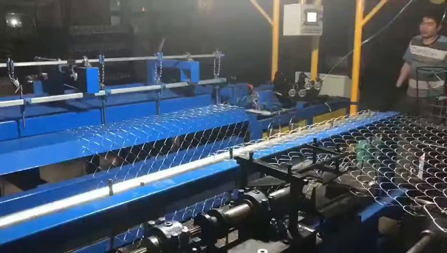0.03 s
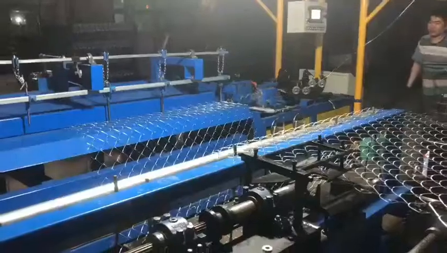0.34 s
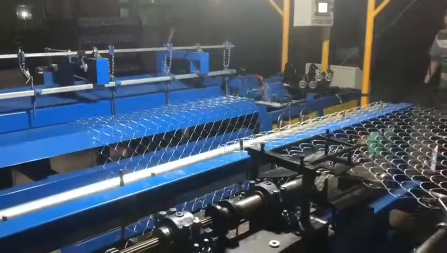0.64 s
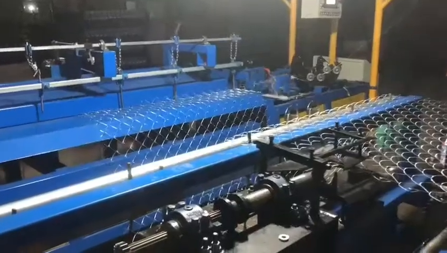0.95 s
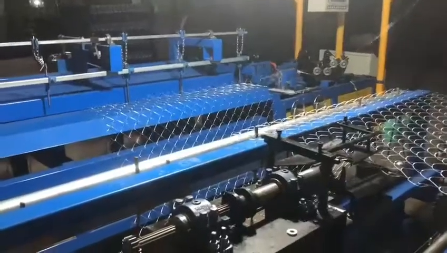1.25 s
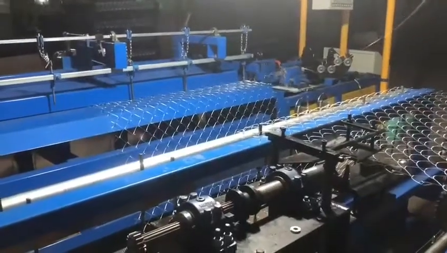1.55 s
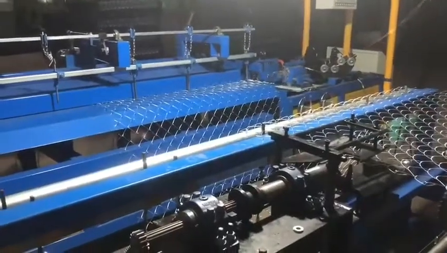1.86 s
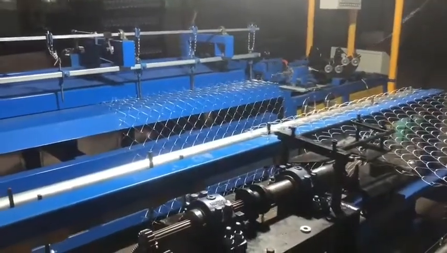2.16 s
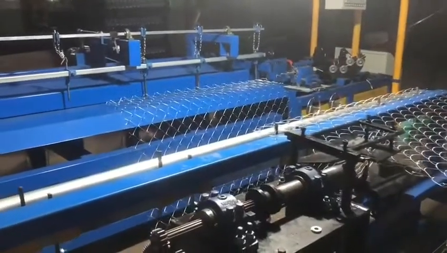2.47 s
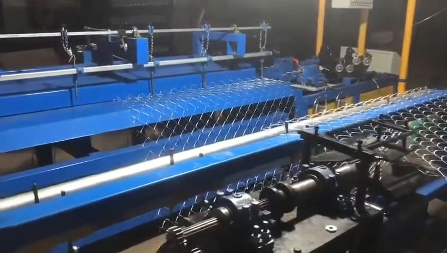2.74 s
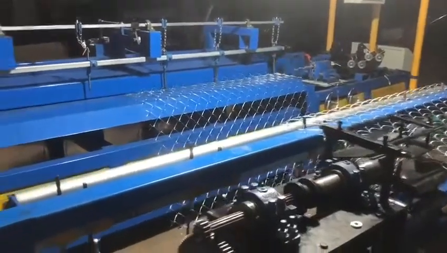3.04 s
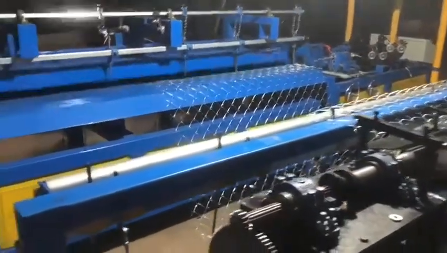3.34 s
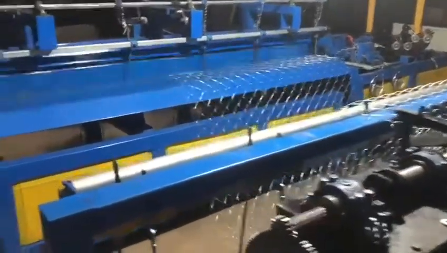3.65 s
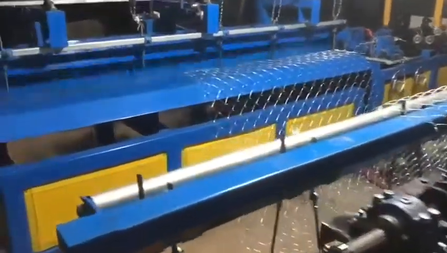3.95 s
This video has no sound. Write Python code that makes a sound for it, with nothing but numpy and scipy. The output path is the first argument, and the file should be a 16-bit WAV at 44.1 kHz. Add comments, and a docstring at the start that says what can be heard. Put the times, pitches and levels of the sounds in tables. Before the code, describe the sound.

Wire weaving machinery rattles rapidly in a rumbling workshop, ending with heavy steel clanks.

```python
"""A wire-mesh weaving machine works in a hard-walled, rumbling workshop.
First its gears grind and the twisting spindles clatter about nine times a second, over shaft knocks and
light clinks. Near 2.4 s they run down; a joint squeaks and a feed motor whines up. At 2.7 s the frame
takes a heavy clunk, then the mesh scrapes over the bed. At 3.5 s the beam shifts, settles with a low
boom and slams against its steel stops, leaving the bed shuddering as the rumble swells."""
import sys
import numpy as np
from scipy import signal
from scipy.fft import rfft, irfft
from scipy.io import wavfile
from scipy.ndimage import uniform_filter1d

SR = 44100
rng = np.random.default_rng(int(sys.argv[2]) if len(sys.argv) > 2 else 0)


def materialize(psi):
    """Save the field psi as 16-bit PCM at rate SR to the path in sys.argv[1].

    A 1-D psi becomes a single channel; in a 2-D psi each row is a channel.
    """
    bounded = np.clip(np.atleast_2d(psi).T, -1, 1)
    quanta = np.round(bounded * 32767).astype(np.int16)
    wavfile.write(sys.argv[1], SR, quanta)


N = 176400
TIME = np.arange(N) / SR

# Fader rides for the sustained layers. Each row: time in seconds, level in dB.
DRIVE_LEVEL = [(0, -32.5), (.4, -33), (.8, -31), (1.3, -32), (1.65, -30.5), (2.0, -32.5), (2.2, -31.5),
               (2.35, -37.5), (2.48, -47), (2.6, -68)]
SCRAPE_LEVEL = [(3.12, -79), (3.19, -42), (3.28, -38), (3.38, -36), (3.5, -34.5), (3.6, -45), (4, -63)]
CHURN_LEVEL = [(2.42, -48.5), (2.53, -38), (2.7, -38), (3.05, -36.5), (3.2, -55), (3.5, -44), (4, -32)]
RUMBLE_LEVEL = [(0, -41.5), (2.5, -43.5), (3.0, -39), (4, -32)]

# The tone colour of each part. Each row: frequency in Hz, relative level in dB.
GEAR_EQ = [(40, -40), (80, -38), (120, -36), (210, -9), (300, -9), (480, -5.5), (740, -3.5), (900, -2),
           (1350, -2.5), (2000, -5.5), (3000, -9.5), (5500, -12), (8500, -20), (14000, -21.5)]
SPINDLE_EQ = [(100, -28.5), (700, -14), (1500, -11.5), (2800, -3.5), (4500, 1.5), (6300, 0.5), (8000, -2.5),
              (11000, -6), (14000, -7)]
FRAME_EQ = [(30, -43), (58, -8), (78, -18), (110, -5.5), (200, 3), (300, -1.5), (450, 0.5), (900, -2.5),
            (1300, -1), (1750, 1), (2100, -3), (2500, -8.5), (5000, -16), (8000, -23.5), (14000, -29)]
BEAM_EQ = [(30, -28), (58, -22), (78, -23), (110, -7), (160, -4.5), (420, 1), (740, -.5), (1300, -1.5),
           (2200, -5), (5500, -9), (8000, -11.5), (14000, -21)]
STOP_EQ = [(40, -39), (200, -8), (600, 0), (1200, 2.5), (2500, 4.5), (4000, 3.5), (5800, 6), (7500, -7),
           (14000, -11)]
BED_EQ = [(40, -47), (200, -5), (450, -2), (700, -2.5), (1150, 1.5), (2000, -0.5), (3200, -2), (5500, -7.5),
          (8000, -14), (14000, -27)]
MESH_EQ = [(100, -7), (600, -12), (1300, 5.5), (2200, -2.5), (4500, -2.5), (8000, -6.5), (14000, -15)]
WIRE_EQ = [(200, -26), (2000, -14.5), (4000, -3.5), (7000, -2.5), (10000, -7), (14000, -7)]
CHURN_EQ = [(100, -44), (400, 6.5), (650, -5), (950, 0.5), (1400, 3), (2150, -3), (2400, -13.5),
            (5000, -24), (14000, -36)]
RUMBLE_EQ = [(25, -54), (58, -9), (78, -17), (100, -3), (150, -4.5), (260, 0), (500, -0.5), (1200, -8),
             (3000, -11), (14000, -44)]

# Droning resonances. Each row: pitch in Hz, nominal width in Hz, level in dB relative to the fader.
HOUSING_RESONANCES = [(235, 19.5, -18), (297, 27, -11), (356.3, 36.7, -7), (744, 81, -19.5)]
MOTOR_HUM = [(151.3, 6.6, -12), (217, 22, -7)]

# One rattle per spindle turn. Each row: start in seconds, level in dB, attack in seconds.
SPINDLE_TURNS = [(.1, -27, .01), (.207, -27.5, .012), (.302, -27.5, 0.019), (0.441, -27.5, 0.008),
                 (.52, -27.5, 0.012), (.59, -29, .012), (.675, -30, 0.017), (.76, -28.5, 0.02),
                 (.898, -29.5, 0.007), (.99, -32, 0.015), (1.09, -27.5, 0.018), (1.13, -29.5, 0.014),
                 (1.205, -27, 0.024), (1.331, -25, 0.02), (1.437, -28.5, 0.022), (1.559, -21, 0.014),
                 (1.665, -25, 0.0078), (1.795, -23, 0.01), (1.89, -26, 0.013), (2.017, -22, 0.0092),
                 (2.12, -27, 0.032), (2.238, -25.5, 0.021), (2.36, -29, 0.015)]

# Hits on steel and wire. Each row: start in seconds, level in dB, attack and decay in seconds.
FRAME_CLUNKS = [(2.722, -26, 0.0067, .02), (2.736, -12, 0.0026, 0.012), (2.752, -11.5, 0.0031, 0.035)]
BEAM_SHIFTS = [(3.51, -12, 0.014, 0.029), (3.552, -12, 0.0029, 0.021), (3.582, -12.5, 0.0071, 0.035),
               (3.62, -19.5, 0.0061, 0.058)]
BEAM_BOOMS = [(3.668, -18.5, 0.0097, .055)]  # the boom's modes alone set its decay
STOP_SLAMS = [(3.7625, -9, 0.0016, 0.018), (3.79, -18, 0.004, 0.015)]
BED_SHUDDERS = [(3.785, -14, 0.022, 0.031), (3.828, -13, 0.0062, 0.029)]
WIRE_JINGLES = [(.441, -28, 0.008, 0.011), (.765, -33, .012, .015), (1.796, -27, 0.0048, 0.014),
                (2.02, -29, .008, .01), (2.65, -39.5, 0.067, 0.027), (2.718, -25, 0.0063, 0.023),
                (2.82, -27, 0.011, 0.023), (2.93, -29.5, 0.02, 0.02), (3.14, -28, 0.026, 0.023),
                (3.555, -15.5, 0.0019, 0.017), (3.762, -20, 0.0023, 0.019)]

# The ring of struck steel. Each row: pitch in Hz, relative level in dB, seconds to fade by 60 dB.
FRAME_MODES = [(297, -1, 0.26), (570, -5, 0.25), (870, -5, 0.42), (1080, -4, .45), (1303, 0, .37),
               (1678, 8, 0.27), (1800, -13, .22), (2060, 3.5, 0.19)]
BEAM_MODES = [(147.6, -7, .92), (208, -1, .8), (338, -3, 0.43), (477, -3, .5), (570, 3, .5), (593, 3, 0.41),
              (738, -1, 0.44), (1300, 2, 0.47), (3050, 7, 0.13)]
BEAM_BOOM_MODES = [(187, -5.5, 0.32), (219, -1.5, 0.67), (283, -5, 0.45), (654, -2.5, 0.66)]

# The feed motor's whine. Each row: time in seconds, pitch in Hz, fundamental and octave levels in dB.
FEED_WHINE = [(2.5, 860, -77, -72), (2.54, 950, -40, -38.5), (2.7, 945, -53, -68), (3.12, 952, -65, -62),
              (3.2, 955, -62, -36), (3.255, 939, -55, -60), (3.3, 942, -65, -52), (3.36, 917, -53, -63),
              (4, 930, -57, -63)]
# A joint squeaks as the feed takes up. Each row: time in seconds, pitch in Hz, level in dB.
JOINT_SQUEAK = [(2.44, 632, -48), (2.46, 690, -49), (2.482, 787, -32), (2.503, 850, -40), (2.52, 870, -73)]
# Light clinks, then the beam ringing. Each row: start in seconds, pitch in Hz, level in dB.
STEEL_NOTES = [(0.142, 1270, -32), (.172, 813, -29), (.205, 1357, -28), (.512, 3300, -30),
               (.637, 1343, -25.5), (.776, 1103, -29), (.968, 3715, -28.5), (1.05, 706, -25.5),
               (1.113, 2066, -29), (1.185, 1350, -22.5), (1.437, 2406, -29), (1.626, 1410, -23.5),
               (1.632, 1300, -28), (1.639, 807, -26.5), (1.75, 1360, -28), (1.864, 3704, -25.5),
               (1.869, 1192, -25.5), (1.884, 1272, -26), (2.188, 1217, -29), (3.28, 1883, -36),
               (3.338, 1327, -28.5), (3.542, 738, -12), (3.59, 1062, -15), (3.759, 927, -16.5)]
# Close-up accents. Each row: start in seconds, level in dB.
WIRE_SNAPS = [(.444, -29), (.778, -31), (1.095, -35), (1.576, -33), (1.801, -24), (2.026, -27),
              (2.743, -22.5), (2.945, -36), (3.557, -16.5), (3.7625, -19.5), (3.77, -16.5)]
SHAFT_KNOCKS = [(0.204, -29), (0.316, -25), (.765, -26), (.98, -31), (1.445, -30), (1.674, -30),
                (1.89, -30), (2.1, -26.5)]

# The hall's reverb tail. Each row: frequency in Hz, seconds to fade by 60 dB.
HALL_T60 = [(100, 1), (500, 0.56), (2000, 0.71), (4500, 0.82), (8000, 0.43), (14000, 0.39)]
EARLY_T60_S, EARLY_DB, TAIL_DB = 0.28, -4, -2.5
HIT_CONTACTS_PER_S = 4000


def gear_drive():
    """Tooth contacts grind and shake the housing until the drive runs down."""
    level_db, = in_time(DRIVE_LEVEL)
    flutter_db = 1.5 * drift(rate_hz=17)
    teeth = contacts(per_s=7000, spread_db=0.5) * from_db(flutter_db)
    return from_db(level_db) * (colour(teeth, GEAR_EQ) + resonate(teeth, HOUSING_RESONANCES))


def spindles(decay_s=0.044):
    """Each turn throws a short, bright spray of steel contacts."""
    turns = bursts([(start, db, attack, decay_s) for start, db, attack in SPINDLE_TURNS])
    return colour(turns * contacts(per_s=5000, spread_db=2.5), SPINDLE_EQ)


def heavy_hits():
    """Heavy parts meet in bursts of chattering contacts, each coloured by the body it strikes."""
    parts = [(FRAME_CLUNKS, FRAME_EQ), (BEAM_SHIFTS, BEAM_EQ),
             (STOP_SLAMS, STOP_EQ), (BED_SHUDDERS, BED_EQ)]
    return sum(colour(bursts(hits) * contacts(HIT_CONTACTS_PER_S, spread_db=1.5), eq)
               for hits, eq in parts)


def steel_ring():
    """Frame and beam ring on after their hits, the beam with a low boom as it settles."""
    frame = from_db(-4) * ringing(FRAME_CLUNKS, FRAME_MODES)
    beam = from_db(-8) * ringing(BEAM_SHIFTS, BEAM_MODES)
    return frame + beam + ringing(BEAM_BOOMS, BEAM_BOOM_MODES)


def feed_motor():
    """A wavering whine runs up to speed over the churn of its gears."""
    hz, fundamental_db, octave_db = in_time(FEED_WHINE)
    churn_db, = in_time(CHURN_LEVEL)
    phase = wavering_phase(hz, depth=0.0206, rate_hz=64)
    whine = from_db(fundamental_db) * np.sin(phase) + from_db(octave_db) * np.sin(2 * phase)
    churn = from_db(churn_db) * colour(rng.standard_normal(N), CHURN_EQ)
    return np.sqrt(2) * whine + churn


def mesh():
    """The woven wire scrapes over the bed and jingles when jolted."""
    scrape_db, = in_time(SCRAPE_LEVEL)
    scrape = colour(from_db(scrape_db) * contacts(per_s=3500, spread_db=4), MESH_EQ)
    jingle = colour(bursts(WIRE_JINGLES) * contacts(per_s=4000, spread_db=4.5), WIRE_EQ)
    return scrape + jingle


def wire_snaps(attack_s=0.00053, decay_s=0.01):
    """Wire whips against steel in dry, bright cracks."""
    cracks = bursts([(start, db, attack_s, decay_s) for start, db in WIRE_SNAPS])
    return colour(cracks * contacts(HIT_CONTACTS_PER_S, spread_db=3), WIRE_EQ)


def steel_notes(attack_s=0.009, t60_s=0.16):
    """Short steel notes: light clinks, then the beam ringing as it shifts and slams."""
    return sum(ringing([(start, db, attack_s, 0)], [(hz, 0, t60_s)]) for start, hz, db in STEEL_NOTES)


def shaft_knocks(attack_s=0.015, pitch_hz=312, t60_s=0.31):
    """On some revolutions the shaft softly knocks the housing, which rings briefly."""
    knocks = [(start, db, attack_s, 0) for start, db in SHAFT_KNOCKS]
    return ringing(knocks, [(pitch_hz, 0, t60_s)])


def joint_squeak():
    """Sticking steel gives a short, rough, rising squeal."""
    hz, level_db = in_time(JOINT_SQUEAK)
    phase = wavering_phase(hz, depth=0.069, rate_hz=160)
    gate = (TIME > JOINT_SQUEAK[0][0]) & (TIME < JOINT_SQUEAK[-1][0])
    return np.sqrt(2) * from_db(level_db) * np.sin(phase) * gate


def hall_rumble():
    """Room tone: low noise and motor hum fill the hall."""
    level_db, = in_time(RUMBLE_LEVEL)
    rumble = colour(rng.standard_normal(N), RUMBLE_EQ)
    hum = resonate(rng.standard_normal(N), MOTOR_HUM)
    return from_db(level_db) * (rumble + hum)


def hall_response():
    """Quick reflections off the machine, and a hall tail whose top end dies first."""
    age, hz = TIME[:SR], np.arange(SR // 2 + 1)
    centres = np.geomspace(100, 14000, 8)
    white, tail = rfft(rng.standard_normal(SR)), 0
    for centre, share in zip(centres, np.eye(len(centres))):
        band = irfft(white * at_hz(list(zip(centres, share)), hz), SR)
        tail = tail + band * from_db(-60 * age / at_hz(HALL_T60, centre))
    tail *= np.minimum(age / 0.02, 1)  # 20 ms fade-in
    early = rng.standard_normal(SR) * from_db(-60 * age / EARLY_T60_S)
    return from_db(EARLY_DB) * unit_energy(early) + from_db(TAIL_DB) * unit_energy(tail)


def workshop(x, paths=8, slot_samples=1024):
    """Contacts fall all along the machine, so the send crossfades between paths through the hall."""
    position = np.arange(N) / slot_samples
    slot, fade = position.astype(int), position % 1 * np.pi / 2
    path = np.cumsum(rng.choice(np.arange(1, paths // 2), slot[-1] + 2)) % paths
    wet = 0
    for k in range(paths):
        send = (path[slot] == k) * np.cos(fade) + (path[slot + 1] == k) * np.sin(fade)
        wet = wet + through(x * send, hall_response())
    return (x + wet) / np.sqrt(1 + from_db(EARLY_DB) ** 2 + from_db(TAIL_DB) ** 2)


def contacts(per_s, spread_db, window=1500):
    """Random metal-on-metal clicks of uneven strength, levelled to a steady power."""
    clicks = (rng.random(N) < per_s / SR) * from_db(spread_db * rng.standard_normal(N))
    clicks *= rng.choice([-1, 1], N)
    power = np.abs(uniform_filter1d(clicks ** 2, window))
    return clicks / np.sqrt(power + 1e-6)


def bursts(hits):
    """Envelope of hits with a linear attack and exponential decay; their powers add."""
    power = np.zeros(N)
    for start, db, attack, decay in hits:
        first = max(int(start * SR), 0)
        age = TIME[:min(SR, N - first)]
        envelope = np.minimum(age / attack, 1) * np.exp(-np.maximum(age - attack, 0) / decay)
        power[first:first + len(age)] += (from_db(db) * envelope) ** 2
    return np.sqrt(power)


def ringing(hits, modes):
    """Every hit sets the modes ringing, each with a fresh strength and phase."""
    ring = np.zeros(N)
    for start, db, attack, _ in hits:
        first = int(start * SR)
        age = TIME[:min(SR // 2, N - first)]
        for hz, mode_db, t60 in modes:
            level_db = db + mode_db + rng.normal(0, 1) - 60 * age / t60
            envelope = from_db(level_db) * np.minimum(age / attack, 1)
            ring[first:first + len(age)] += envelope * np.sin(2 * np.pi * (hz * age + rng.random()))
    return ring / np.sqrt(sum(from_db(db) ** 2 for _, db, _ in modes))


def resonate(x, resonances):
    """Drive steep resonances, each at its own rms level."""
    drone = 0
    for hz, width, db in resonances:
        b, a = signal.iirpeak(hz, hz / (2 * width), fs=SR)
        band = signal.lfilter(b, a, signal.lfilter(b, a, x))
        drone = drone + from_db(db) * rms_one(band)
    return drone


def colour(x, eq, size=8192):
    """Minimum-phase EQ that keeps the power of white noise."""
    hz = np.arange(size // 2 + 1) * SR / size
    cepstrum = irfft(np.log(from_db(at_hz(eq, hz))))
    cepstrum[1:size // 2] *= 2  # folded forward, so nothing rings ahead of a hit
    cepstrum[size // 2 + 1:] = 0
    response = irfft(np.exp(rfft(cepstrum)))
    return through(x, unit_energy(response))


def wavering_phase(hz, depth, rate_hz):
    """Phase of a tone with random vibrato; depth is a fraction of the pitch."""
    return 2 * np.pi * np.cumsum(hz * (1 + depth * drift(rate_hz))) / SR


def drift(rate_hz):
    """Smooth random modulation at rms 1."""
    hz = np.arange(N // 2 + 1) * SR / N
    return rms_one(irfft(rfft(rng.standard_normal(N)) / (1 + (hz / rate_hz) ** 2), N))


def through(x, response):
    """Pass a sound through an impulse response."""
    return signal.fftconvolve(x, response)[:N]


def in_time(rows):
    """Read each automation column at every sample."""
    seconds, *columns = np.transpose(rows)
    return [np.interp(TIME, seconds, column) for column in columns]


def at_hz(points, hz):
    """Read a table on a log-frequency axis."""
    frequencies, values = np.transpose(points)
    return np.interp(np.log(np.maximum(hz, 1)), np.log(frequencies), values)


def from_db(db):
    """Decibels to gain."""
    return 10 ** (np.asarray(db) / 20)


def rms_one(x):
    """Scale to rms 1."""
    return x / np.sqrt(np.mean(x ** 2) + 1e-20)


def unit_energy(x):
    """Scale a response so that it keeps the power of white noise."""
    return x / np.sqrt(np.sum(x ** 2) + 1e-20)


def scene():
    """Mono mix: the machine in its hall, dry close-up details, and room tone underneath."""
    machine = gear_drive() + spindles() + mesh() + heavy_hits() + feed_motor()
    close_up = shaft_knocks() + steel_notes() + wire_snaps() + steel_ring() + joint_squeak()
    return (workshop(machine) + close_up + hall_rumble())[None]


def record(dry):
    """Cut in hard, soft-clip the peaks and trim the top end."""
    start_s, cutoff_hz = 0.12, 14100
    rounded = 0.89 * np.tanh(dry * (TIME >= start_s) / 0.9)
    lowpass = signal.ellip(10, .05, 60, cutoff_hz, fs=SR, output="sos")
    return signal.sosfiltfilt(lowpass, rounded)


dry = scene()
out = record(dry)
materialize(out)
```